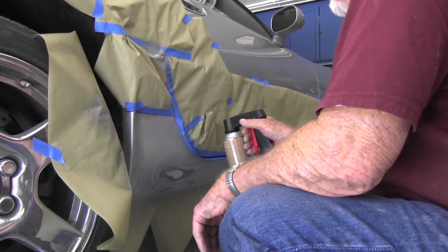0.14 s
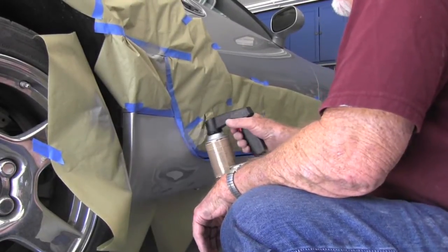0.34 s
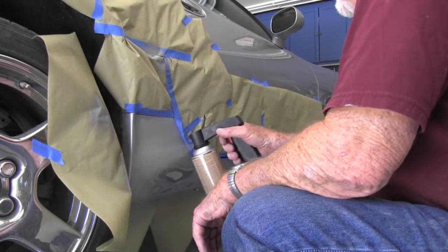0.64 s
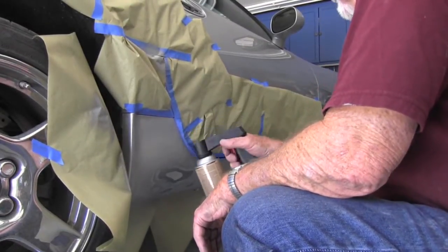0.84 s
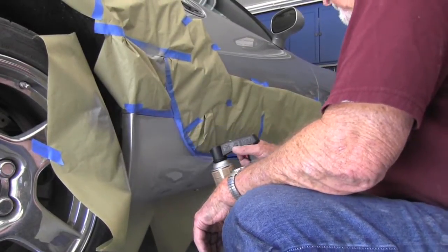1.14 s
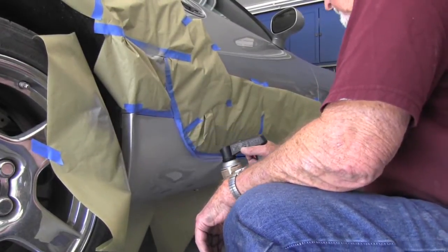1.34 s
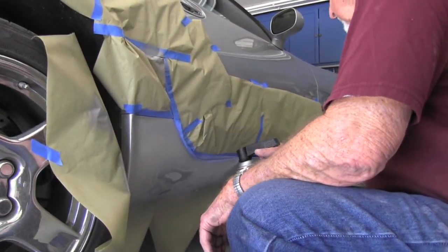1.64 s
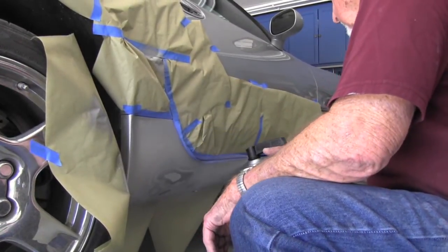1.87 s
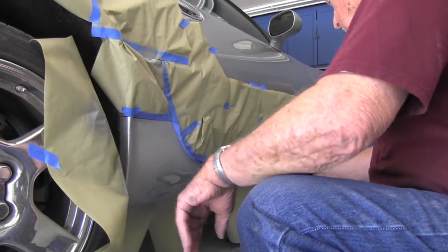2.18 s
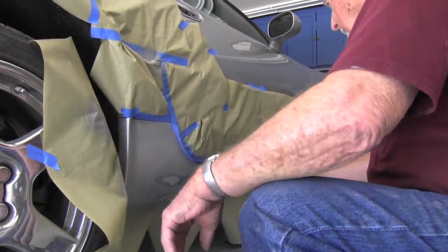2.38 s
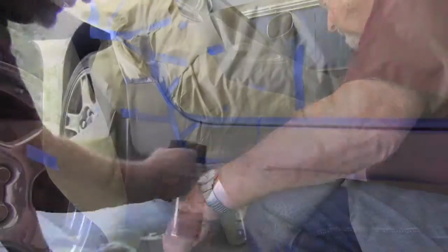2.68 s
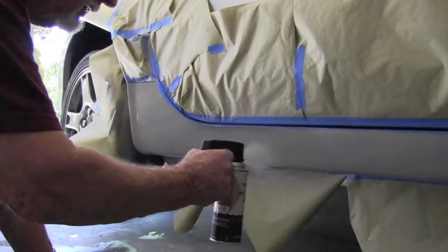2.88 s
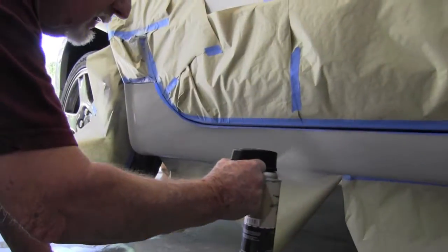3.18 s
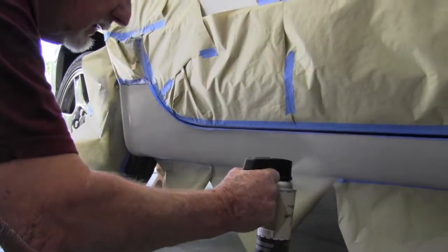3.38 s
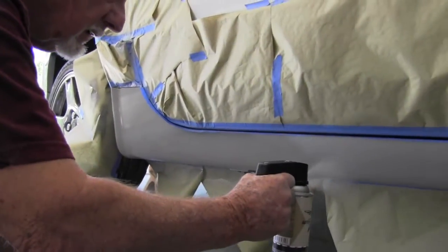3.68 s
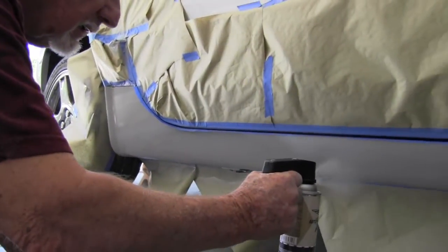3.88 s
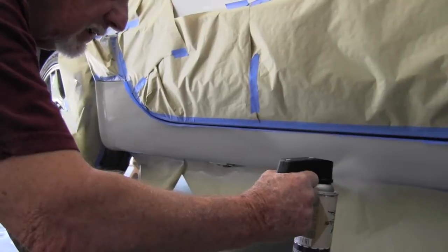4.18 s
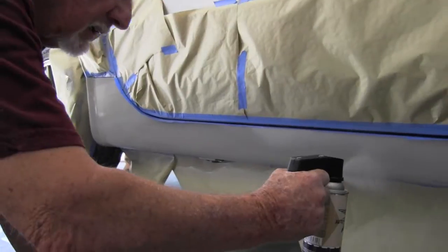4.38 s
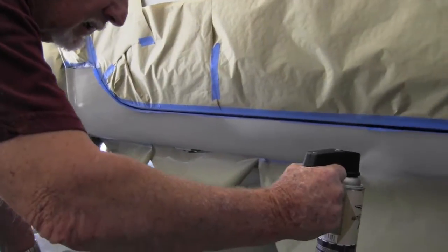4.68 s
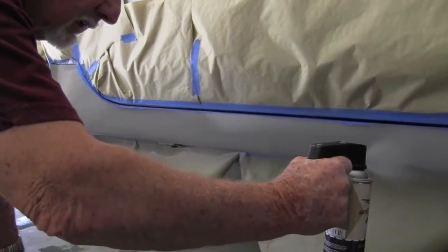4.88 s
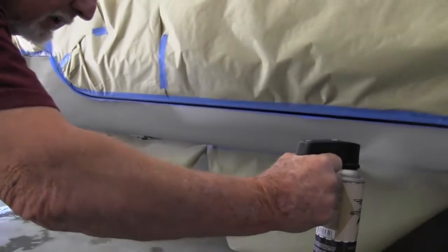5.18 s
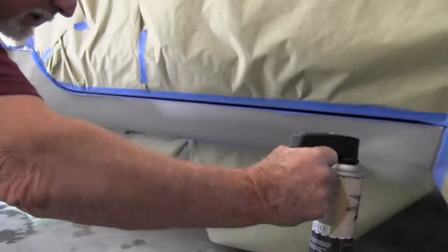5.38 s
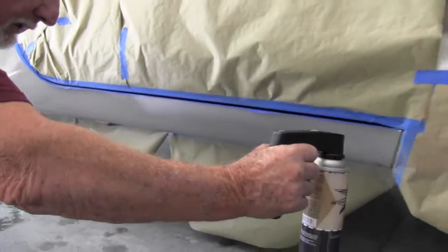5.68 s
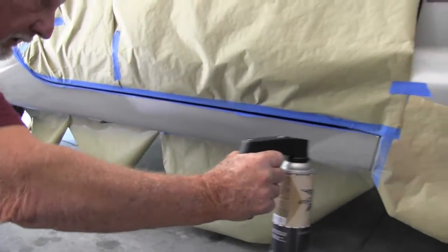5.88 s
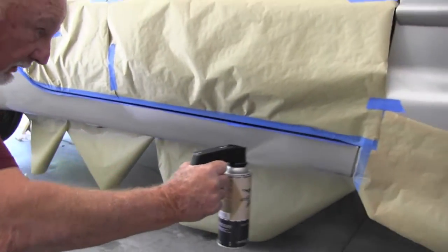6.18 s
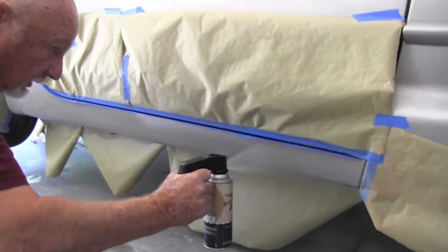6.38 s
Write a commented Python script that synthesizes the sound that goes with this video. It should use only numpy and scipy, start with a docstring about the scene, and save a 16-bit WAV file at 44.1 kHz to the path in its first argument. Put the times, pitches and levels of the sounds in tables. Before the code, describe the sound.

An aerosol paint can sprays close by, outdoors. A short spurt of hiss ends almost at once, and a second runs from about 0.3 to 0.8 seconds. A longer pass follows from 1 to 2.3 seconds, the longest from 2.5 to 5.7, and a last one from 5.9 continues to the end at 6.5. Each press surges and settles into a bright, slightly sputtering hiss with a hollow ring and a faint breathy whistle. Its tone slides as the hand moves, growing fizzier and wider around 4 to 5.5 seconds. After each release the gas quickly dies away and the plastic trigger clicks: lightly at 0.3, 0.9 and 2.4 seconds, sharply just before 5.9. Soft dull knocks and scuffs come near 3.7 and 3.9, and between 5.5 and 6.3 seconds. Quiet outdoor air lies underneath, with a faint low machine hum gradually rising.

```python
"""Spray-painting a car's sill

An aerosol can with a clip-on trigger handle: two spurts, then long passes. Each press surges and
settles; the jet hisses and sputters, and the cap's hollows ring with it. The hand's distance from the
panel slides the reflections, opens the fizz and makes the nozzle whistle. After each release the gas
dies away and the trigger clicks; outdoor air, a low hum and a few knocks lie behind."""
import sys
import numpy as np
from scipy import signal
from scipy.fft import rfft, irfft, next_fast_len
from scipy.io import wavfile
from scipy.ndimage import uniform_filter1d, map_coordinates

SR = 44100
rng = np.random.default_rng(int(sys.argv[2]) if len(sys.argv) > 2 else 0)


def inscribe(sig):
    """Save sig as 16-bit PCM at rate SR to the path in sys.argv[1].

    A 1-D sig is mono; a 2-D sig holds one channel per row.
    Samples are clipped to [-1, 1] before scaling.
    """
    pcm = np.round(np.clip(np.atleast_2d(sig).T, -1, 1) * 32767)
    wavfile.write(sys.argv[1], SR, pcm.astype(np.int16))


N = 287973
T = np.arange(N) / SR


def amp(db):
    return 10 ** (np.asarray(db) / 20)


def unit(x):
    return x / np.sqrt(np.mean(x ** 2) + 1e-20)


def curve_at(points, hz):
    """A curve joined by straight lines on a log-frequency axis."""
    f, value = np.transpose(points)
    return np.interp(np.log(hz + 1), np.log(f), value)


def automation(rows):
    """One lane per column after the time, ramped between breakpoints."""
    times, *columns = np.transpose(rows)
    return [np.interp(T, times, column) for column in columns]


def drift(hz):
    """Smooth random modulation of rms 1, no faster than about hz."""
    f = np.fft.rfftfreq(N, 1 / SR)
    return unit(irfft(rfft(rng.standard_normal(N)) * np.exp(-(f / hz) ** 2) * (f > 0), N))


def resonate(x, hz, width):
    """A steep resonance that tracks hz; rms 1."""
    turn = np.exp(2j * np.pi * np.cumsum(hz * np.ones(N)) / SR)
    pole = np.exp(-np.pi * width / SR)
    return unit((turn * signal.lfilter([1], [1, -2 * pole, pole * pole], x / turn)).real)


# Stereo image of the noise: f/Hz, left-right correlation
CORRELATION = [(60, 0.71), (150, 0.52), (400, 0.77), (1000, 0.67), (1800, 0.73), (2800, 0.92), (4000, 1),
               (6500, 0.52), (9800, 0.52), (12000, 0.62), (14000, 1)]
def noise(spectrum=((20, 0), (20000, 0))):
    """Coloured stereo noise, partly alike left and right; rms 1."""
    size = next_fast_len(N)
    f = np.fft.rfftfreq(size, 1 / SR)
    mid, side = rfft(rng.standard_normal((2, size)))
    alike = np.clip(curve_at(CORRELATION, f), -1, 1)
    mid, side = mid * np.sqrt(1 + alike), side * np.sqrt(1 - alike)
    return unit(irfft(np.array([mid + side, mid - side]) * amp(curve_at(spectrum, f)), size)[:, :N])


# Presses of the valve: open t/s, shut t/s, surge-to-sag time/s
VALVE_PRESSES = [(-.05, 0.146, 0.62), (0.335, 0.763, 0.19), (0.989, 2.275, 0.36), (2.498, 5.745, 0.33),
                 (5.909, 6.996, 0.14)]
def valve(rise_s, drop_db, bleed_db_per_s):
    """Flow envelope: a fast attack, a drop on release, then the gas in the stem bleeds away."""
    flow = np.zeros(N)
    for opens, shuts, _ in VALVE_PRESSES:
        after = np.maximum(T - shuts, 0)
        fall_db = drop_db * (1 - np.exp(-after / 0.018)) + bleed_db_per_s * after
        flow = np.maximum(flow, np.clip((T - opens) / rise_s, 0, 1) * amp(-fall_db))
    return flow


def surge(settle_sags=1.23):
    """Every press surges, sags and settles: a damped swing from 1 to 0."""
    swing = np.zeros(N)
    for opens, _, sag_s in VALVE_PRESSES:
        age = (T[T >= opens] - opens) / sag_s
        swing[T >= opens] = np.cos(np.pi * age) * np.exp(-age / settle_sags)
    return swing


def puffs(rise_s=0.022, t60=0.25):
    """The first gas of each press blows a short hollow puff through the cap."""
    envelope = sum(np.clip((T - opens) / rise_s, 0, 1) * amp(-60 * np.maximum(T - opens, 0) / t60)
                   for opens, _, _ in VALVE_PRESSES)
    return amp(-33.5) * envelope * resonate(noise(), hz=1450, width=350)


def spits(per_s=110, size_spread_db=5.5):
    """Blobs of paint tear off the nozzle at random, each a tiny dull pop."""
    out, t = np.zeros(N), np.arange(400) / SR
    pitches = np.geomspace(1900, 7000, 8)
    for hz in pitches:
        hits = rng.random(N) < per_s / len(pitches) / SR
        sizes = amp(size_spread_db * np.minimum(rng.exponential(1, N), 2.5))
        pop = np.sin(2 * np.pi * hz * t) * t * np.exp(-t * hz / 0.71) * hz
        out += signal.oaconvolve(hits * sizes, pop)[:N]
    return unit(out)


def streaks(x, depth_db):
    """The jet meets creases and edges, so narrow patches of its spectrum swell and fade."""
    frames = dict(nperseg=1024, noverlap=768)
    spectra = signal.stft(x, **frames)[2]
    patches = rng.standard_normal(spectra.shape[1:])
    for _ in range(2):
        patches = uniform_filter1d(uniform_filter1d(patches, size=6, axis=0), size=24, axis=1)
    gain = unit(amp(depth_db * unit(patches)))
    return signal.istft(spectra * gain, **frames)[1][:, :N]


# Tone of the jet: f/Hz, relative level/dB
JET_EQ = [(100, -31), (260, -32), (430, -21), (560, -0.5), (950, -8), (1180, -7.5), (1500, -3.5),
          (2600, -3), (3400, 0), (4700, 2), (6200, 4), (7600, 4), (9300, -2), (12000, -13)]
def jet(level_db):
    """The body of the hiss: turbulent gas flecked with spits of paint."""
    hiss = amp(level_db) * (amp(1.5) * noise(JET_EQ) + amp(-9.5) * spits())
    return streaks(hiss, depth_db=1.7) * valve(rise_s=0.02, drop_db=6.5, bleed_db_per_s=156)


# Tone of the droplets: f/Hz, relative level/dB
FIZZ_EQ = [(7000, -12), (9600, -3), (10300, 2), (11000, 3.5), (12200, 1), (12750, -1.5), (13500, -1.5),
           (15000, -1), (16000, -14)]
def fizz(level_db):
    """Droplets breaking up put a bright top on the hiss."""
    mist = amp(level_db) * noise(FIZZ_EQ)
    return streaks(mist, depth_db=2.5) * valve(rise_s=0.027, drop_db=12.5, bleed_db_per_s=165)


# Cavities of the cap and handle: f/Hz, width/Hz, relative level/dB
CAP_MODES = [(244.3, 29, -12.5), (429, 180, -8), (1486, 320, 2), (1814, 340, -0.5), (2082, 400, 4)]
def hollows(level_db, flutter_hz=49.77):
    """The jet rings the cap's hollows, fluttering as paint leaves in uneven slugs."""
    ring = unit(sum(amp(db) * resonate(noise(), hz, width) for hz, width, db in CAP_MODES))
    flutter_db = 1.5 * np.sin(2 * np.pi * np.cumsum(flutter_hz * (1 + 0.299 * drift(24.9))) / SR)
    return amp(level_db + flutter_db) * ring * valve(rise_s=0.016, drop_db=5.5, bleed_db_per_s=80)


def whistle(path_cm, best_cm=19, leeway_cm=2.64, choke_db_per_cm=0.4, sharp_hz_per_cm=90):
    """A breathy nozzle whistle peaks at one distance from the panel; closer in, it chokes and goes sharp."""
    too_close_cm = np.maximum(best_cm - path_cm, 0)
    off_best = 1 - np.exp(-((path_cm - best_cm) / leeway_cm) ** 2)
    level_db = -2.5 - 9 * off_best - choke_db_per_cm * too_close_cm
    return amp(level_db) * resonate(noise(), hz=3778 + sharp_hz_per_cm * too_close_cm, width=380)


FAR_CM = 23  # extra path by way of the panel at the far end of the sweep
# The gap between can and car at that far end: f/Hz, width/Hz, relative level/dB
GAP_MODES = [(7500, 730, -10), (10400, 290, -4.5), (12100, 630, -10), (13250, 750, -8.5), (14250, 750, -6),
             (15200, 900, -7.5)]
def gap(path_cm, stretch, waver=0.011, flicker_db=4.8, db_per_cm=3.1):
    """Turbulence rings the gap in narrow, unsteady bands that sink and grow as the arm reaches out."""
    gas, rings = noise(), np.zeros((2, N))
    for hz, width, db in GAP_MODES:
        gain = amp(db + flicker_db * drift(3.7))
        rings += gain * resonate(gas, hz / stretch * (1 + waver * drift(2.8)), width)
    return amp(db_per_cm * (path_cm - FAR_CM)) * rings


def widen(x, side_db):
    """Stereo width: a gain on the side signal."""
    mid = x.mean(0)
    return mid + amp(side_db) * (x - mid)


def panel(x, stretch, strength=0.22, sway=0.0496, taps=6):
    """Early reflections off panel and ground move with the hand, sliding a comb through the hiss."""
    out = x.copy()
    for k, delay in enumerate(np.geomspace(.0012, .0095, taps)):
        read_at = (T - delay * stretch * (1 + sway * drift(0.88))) * SR
        reflection = np.array([map_coordinates(channel, [read_at], order=2) for channel in x])
        out += (-1) ** k * strength * reflection
    return out / np.sqrt(1 + taps * strength ** 2)


# The hand's sweep: t/s, extra path by way of the panel/cm, hiss base level/dB, hollows base level/dB
HAND_SWEEP = [(0, 19.1, -33.5, -33), (.5, 20.5, -34, -34.5), (.7, 17.5, -32.5, -34),
              (1.45, 18.7, -32.5, -31), (1.95, 18.2, -32.5, -36.5), (2.27, 15.7, -34, -36.5),
              (2.75, 14.8, -37, -42.5), (3.04, 17.4, -34.5, -45.5), (3.33, 20, -34.5, -41),
              (3.8, 20.3, -33.5, -41), (4.05, 22.4, -34, -42), (4.35, 22.55, -35.5, -39.5),
              (5.0, 23.3, -34, -40), (5.72, 22.6, -33, -39), (6.07, 18.8, -32.5, -37.5),
              (6.27, 15.5, -33, -38), (6.53, 15, -34, -39.5)]
def spray():
    """Jet, fizz and the resonances they blow ride the hand's sweep; paint makes the flow sputter."""
    path_cm, hiss_db, hollow_db = automation(HAND_SWEEP)
    reach_cm = path_cm - 18.9  # from mid sweep; reaching out opens the fizz and the stereo width
    stretch = (path_cm / FAR_CM) ** 0.5465
    surge_db = surge()  # 1 dB on the jet, deeper on the whistle and hollows
    hiss = jet(hiss_db + surge_db) + fizz(hiss_db + 0.75 + 0.24 * reach_cm)
    tones = amp(2 * surge_db) * whistle(path_cm) + gap(path_cm, stretch)
    hiss += amp(hiss_db) * tones * valve(rise_s=0.013, drop_db=17, bleed_db_per_s=125)
    hiss = widen(hiss, side_db=-4 + 1.1 * reach_cm)
    hiss += hollows(hollow_db + 3.5 * surge_db)
    sputter_db = drift(166) + 0.23 * drift(2.7)
    return panel(hiss * amp(sputter_db), stretch)


# Tone of the open air: f/Hz, relative level/dB
AIR_EQ = [(20, -33), (45, -27), (100, -1), (200, -3.5), (420, .5), (800, -3), (1200, -7), (2000, -14.5),
          (3000, -12.5), (6000, -19.5), (15000, -34)]
def air():
    """A steady, dark bed of outdoor air."""
    return amp(-47.5) * noise(AIR_EQ)


# Partials of the machine: f/Hz, base level/dB
HUM_PARTIALS = [(32.3, -93), (75.2, -60), (105, -97)]
# Fader ride on the hum: t/s, gain/dB
HUM_FADER = [(0, -15), (2.5, -3), (3.05, 1), (6.53, 5)]
def hum(wander_hz=1.13):
    """A distant machine's low hum fades up, its pitch wandering a little."""
    out = np.zeros(N)
    for hz, db in HUM_PARTIALS:
        phase = 2 * np.pi * np.cumsum(hz + wander_hz * drift(4.7)) / SR
        out += amp(db) * np.sqrt(2) * np.sin(phase)
    return out * amp(automation(HUM_FADER)[0])


# Gliding tones: faint whistles of escaping gas, and two gap bands that sink as the arm reaches out: t/s,
# length/s, start f/Hz, end f/Hz, level/dB
GLIDING_TONES = [(0.16, 0.17, 3170, 3080, -51), (2.346, 0.18, 3900, 3300, -51), (3.2, 1.47, 3400, 2800, -44),
                 (3.53, 0.59, 6270, 6050, -43), (4.848, 0.67, 4120, 3700, -42)]
def gliding_tones():
    """Faint tones swell and fade as they glide down: gas whistles after a release or in mid pass, and gap bands
    sinking as the arm reaches out."""
    out, gas = np.zeros((2, N)), noise()
    for start, length, start_hz, end_hz, db in GLIDING_TONES:
        progress = np.clip((T - start) / length, 0, 1)
        swell = np.sqrt(4 * progress * (1 - progress))
        out += amp(db) * swell * resonate(gas, start_hz + (end_hz - start_hz) * progress, width=260)
    return out


# Clicks of the trigger: t/s, dry peak level/dB, base t60/s
TRIGGER_CLICKS = [(0.2769, -23, 0.027), (.915, -25.5, 0.04), (2.444, -24.5, 0.035), (5.8648, -4.5, 0.015)]
# Ring of the plastic handle: f/Hz, relative level/dB, factor on t60
HANDLE_MODES = [(845, -3.5, 3.2), (1230, -25, 0.89), (1560, -7, 0.91), (2120, -2, 0.92), (2500, 5, 0.33),
                (2960, 18.5, 0.095), (3630, 5, 0.35), (4060, 7.5, 0.25), (5650, 1, 0.62)]
def trigger(echo_db=-5.5, echo_t60=0.1, samples=6000):
    """Each click rings the plastic handle; the car body and ground scatter it back."""
    clicks, t = np.zeros(N), np.arange(samples) / SR
    # a small, soft part gives little bass or top
    band = signal.butter(3, [500, 4400], "bandpass", fs=SR, output="sos")
    for start, peak_db, t60 in TRIGGER_CLICKS:
        ring = sum(amp(db - 60 * t / (t60 * factor)) * np.sin(2 * np.pi * hz * t)
                   for hz, db, factor in HANDLE_MODES)
        ring = signal.sosfilt(band, ring)
        clicks[round(start * SR):][:samples] += amp(peak_db) * ring / abs(ring).max()
    scatter = noise()[:, :samples] * amp(-60 * t / echo_t60) * (t > .002)
    scatter *= 1 + 0.29 * np.exp(-((t - .0135) / 0.00077) ** 2)  # the return off the door
    scatter /= np.linalg.norm(scatter[0])
    return clicks + amp(echo_db) * signal.oaconvolve(clicks[None], scatter, axes=1)[:, :N]


# Small noises around the painter, and a stronger puff as the last press opens (5.903 s): t/s, f/Hz, width/Hz,
# level/dB, attack/s, t60/s
KNOCK_CUES = [(3.733, 610, 1000, -33.5, 0.004, 0.055), (3.933, 396, 220, -33, 0.0031, 0.22),
              (5.49, 1060, 650, -36.5, 0.046, 1), (5.903, 1120, 890, -30, 0.021, 0.17),
              (6.114, 328, 119, -45, 0.0052, 0.88), (6.31, 1050, 700, -38, 0.029, 0.37)]
def knocks():
    """Dull knocks and scuffs, and one puff of gas as a press opens: soft bursts of band noise that die away."""
    out, grit = np.zeros((2, N)), noise()
    for start, hz, width, db, attack, t60 in KNOCK_CUES:
        envelope = np.clip((T - start) / attack, 0, 1) * amp(-60 * np.maximum(T - start - attack, 0) / t60)
        out += amp(db) * envelope * resonate(grit, hz, width)
    return out


# Pan of the can: t/s, left minus right level/dB
CAN_PAN = [(0, -0.1), (2.6, 0.8), (3.1, -0.8), (6.53, -1.4)]
def scene():
    """The can, a little off centre, with air, hum and knocks around it."""
    can = puffs() + spray() + gliding_tones() + trigger()
    pan = amp(np.outer([.5, -.5], automation(CAN_PAN)[0]))
    return can * pan + air() + hum() + knocks()


def record(dry):
    """A steep high cut on the whole mix."""
    high_cut = signal.firwin(511, 15900, window=("kaiser", 9), fs=SR)
    return signal.oaconvolve(dry, high_cut[None], "same")


dry = scene()
out = record(dry)
inscribe(out)
```